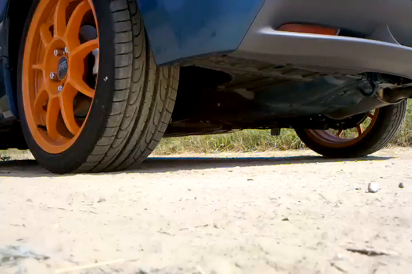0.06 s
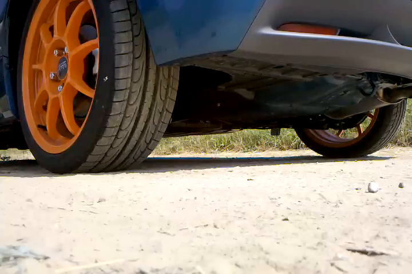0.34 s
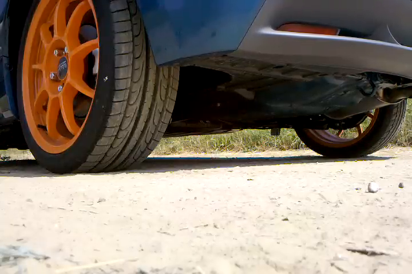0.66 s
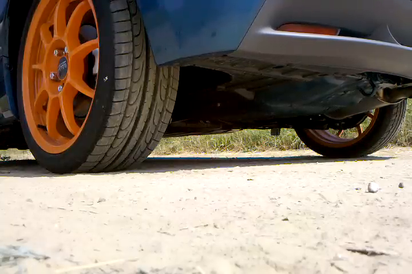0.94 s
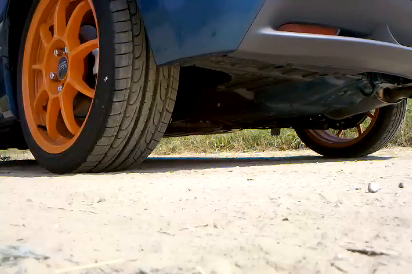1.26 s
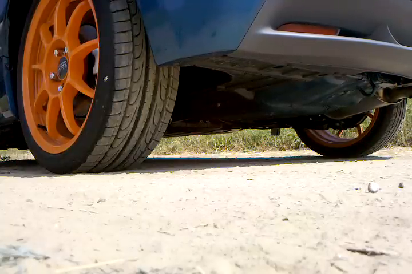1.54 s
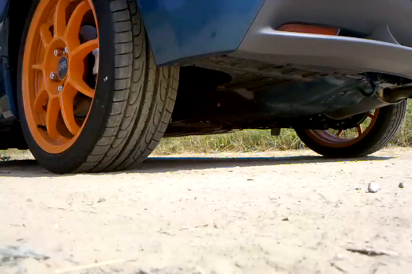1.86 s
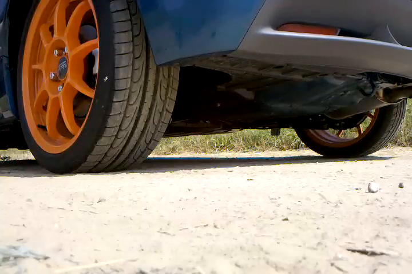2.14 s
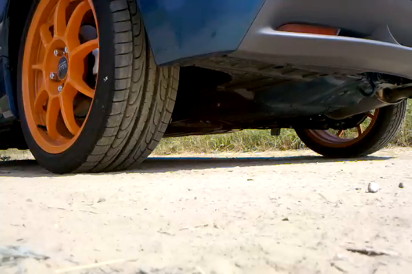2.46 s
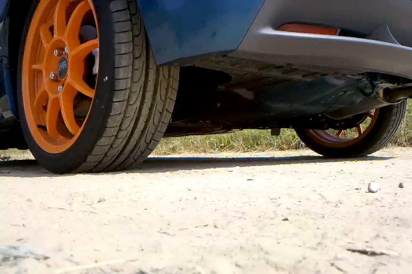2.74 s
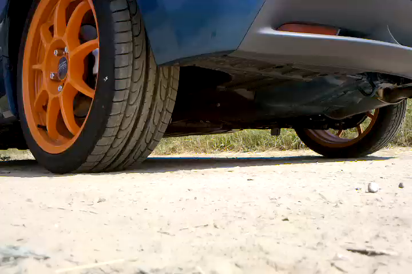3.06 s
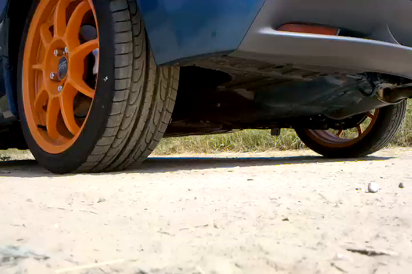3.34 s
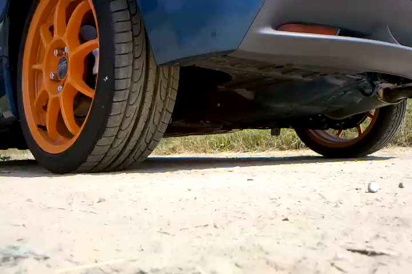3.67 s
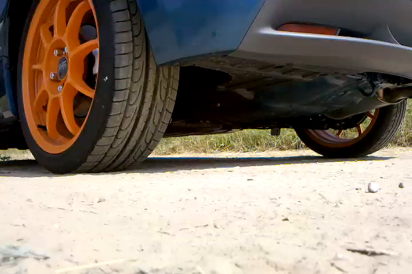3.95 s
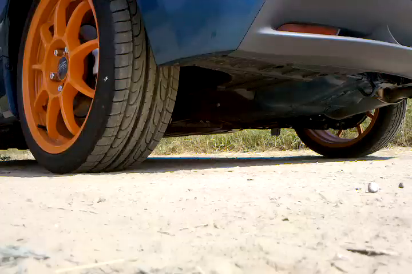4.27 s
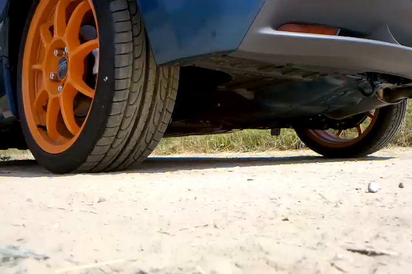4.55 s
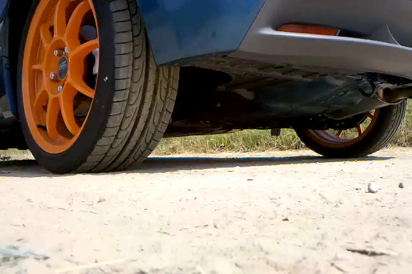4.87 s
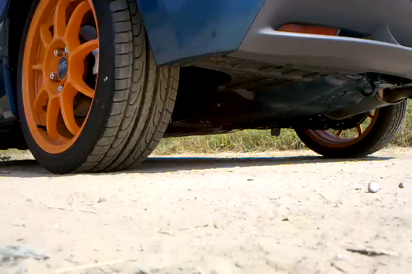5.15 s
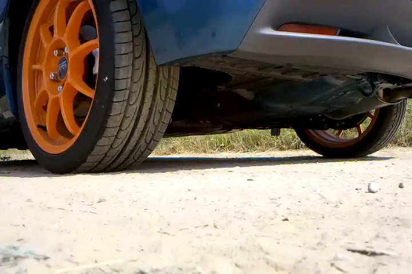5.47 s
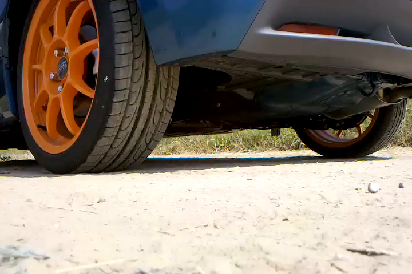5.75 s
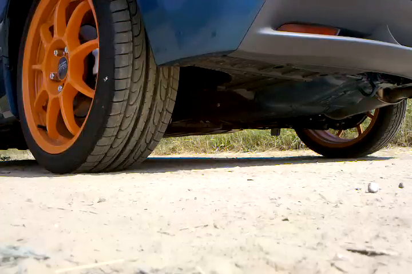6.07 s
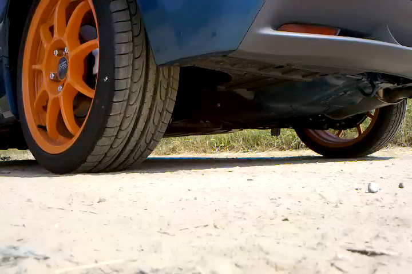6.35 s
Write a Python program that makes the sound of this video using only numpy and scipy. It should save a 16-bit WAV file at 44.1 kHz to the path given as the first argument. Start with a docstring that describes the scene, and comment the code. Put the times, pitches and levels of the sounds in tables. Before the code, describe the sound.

A parked four-cylinder car is revved outdoors, heard near the ground beside the tailpipe. The exhaust has a low, buzzing boom, with ringing overtones, a gassy rasp and hiss. It starts already at high revs, cracks at about 0.2 seconds, sags slightly and climbs again around 0.7. The sound cuts out for an instant at 1 second. The engine then barks against its rev limiter in four even bursts, at about 1.2, 1.6, 2.0 and 2.5 seconds. From 2.8 seconds it coasts down, the pitch falling steadily with a hollow howl as it grows quieter. Another brief silence comes just after 4 seconds. At 4.7 seconds one sharp throttle blip lifts the pitch, peaking near 5 seconds, lower than before. The engine then sinks toward idle with slight stumbles, and the sound stops abruptly at about 6.3 seconds.

```python
"""Outdoors, near the ground beside the tailpipe of a parked four-cylinder car being revved.
It barks off the rev limiter in short burns, coasts down, is blipped once and sinks toward idle.
Exhaust pulses make a low boom; their overtones ring and howl as they glide through the pipe's
resonances. Turbulent gas rasps in the pipe and hisses at its mouth.
The sound drops out abruptly twice, and again at the end."""
import sys
import numpy as np
from scipy import signal
from scipy.fft import rfft, irfft
from scipy.io import wavfile

SR = 44100
rng = np.random.default_rng(int(sys.argv[2]) if len(sys.argv) > 2 else 0)


def digitize_waveform(pressure):
    """Quantize a signal to 16-bit integers and store it at the path in sys.argv[1].

    Rows of a 2-D input are taken as channels; values are limited to [-1, 1].
    """
    field = np.atleast_2d(pressure).T
    bounded = np.clip(field, -1, 1)
    quanta = np.round(bounded * 32767).astype(np.int16)
    wavfile.write(sys.argv[1], SR, quanta)


N = 283122
T = np.arange(N) / SR

# Speed is the firing rate; an order is a multiple of it. Table levels are relative, ahead of the mix.
# Fuel burns at the limiter: start_s, end_s, before_hz, after_hz, crack_db
BURNS = [(.181, .206, 148.8, 156.8, 6), (0.651, .803, 136.2, 163.6, 3), (1.192, 1.280, 150.7, 164.3, 9.5),
         (1.615, 1.703, 151.0, 164.6, 7.5), (2.037, 2.12, 149.3, 165.2, 9.5),
         (2.453, 2.543, 149.3, 164.5, 9)]
# Speed through the run-down and the blip: time_s, firing_hz
RUNDOWN = [(2.8, 148.3), (2.9, 146.2), (3.0, 142.0), (3.2, 131.9), (3.36, 124.7), (3.6, 114.3), (4.0, 97.4),
           (4.4, 83.9)]
BLIP = [(4.71, 71.3), (4.8, 86.2), (4.9, 114.4), (4.97, 127.5), (5.05, 129.3), (5.2, 125.0), (5.6, 107.8),
        (5.8, 96.1), (6.33, 73.7)]
# Throttle presses: opens_s, shuts_s, opening_s, closing_s
PRESSES = [(-.1, 0.23, 0.024, 0.034), (.672, 2.735, .05, 0.092), (4.719, 4.975, .015, .06)]
# Throttle open, fuel cut, cylinders pumping air: firing_hz, tone_db, octave_db, rasp_db
PUMPING = [(150.6, -29.5, -25.5, -35), (154.2, -43.5, -24, -33), (158.1, -30.5, -24, -33.5),
           (162.8, -27, -30, -31)]
# Full power: firing_hz, tone_db, octave_db, ring_db, rasp_db, hiss_db
FULL_POWER = [(73.4, -44, -24, -37.5, -43.5, -46), (90.6, -32.5, -20, -31, -36, -40.5),
              (110.8, -26, -31.5, -35.5, -36.5, -38), (125, -30, -40, -31, -39.5, -40.5),
              (143.5, -17, -30.5, -28, -35, -36), (154.4, -16, -27, -21, -30, -32),
              (163.2, -16, -28.5, -25.5, -30.5, -32.5)]
# Throttle shut: firing_hz, tone_db, octave_db
COASTING = [(72, -52, -34.5), (87.2, -46, -33), (97.4, -45, -39), (105.5, -35.5, -42), (116.3, -27.5, -62),
            (123.8, -25.5, -51), (139, -19.5, -34.5), (148.2, -17.5, -36), (154, -25.5, -46.5)]
# Coasting orders crossing the main resonance: order, centre_hz, half_width_hz, level_db
FLARES = [(4, 614, 4.5, -23.5), (4, 580, 12, -40.5), (5, 583, 13, -34), (5, 612, 18, -38),
          (7, 588, 16, -46.5)]
# Pipe resonances: centre_hz, width_hz, lift_db
MAIN_MODE = (601, 36, 17)
UPPER_MODES = [(1050, 105, 19), (1355, 90, 11), (1530, 100, 9), (1950, 160, 5), (2220, 110, 6),
               (2830, 110, 7), (3150, 140, 7)]
# Spectra of stroke overtones, rasp (throttle open, shut) and hiss: frequency_hz, level_db
OVERTONES = [(220, 5), (295, 17), (360, 6), (460, 6), (540, -12), (750, -11), (900, -15), (1050, -21),
             (1200, -12), (1350, -10), (1700, -9), (2450, -6), (2750, -14), (4800, -21)]
OPEN_RASP = [(70, -32), (130, 7.5), (250, 4.5), (500, 5), (700, 6), (880, 1), (1120, 6), (1380, -6),
             (1780, 4), (2400, -1), (2650, -14), (3500, -19)]
SHUT_RASP = [(70, -27.5), (130, 7.5), (300, 4), (480, 8), (800, 0), (1200, -1.5), (1600, -2.5), (2000, 3),
             (2400, -2), (2650, -7.5), (3500, -14.5)]
HISS = [(1530, -34.5), (2600, -5.5), (2690, -10.5), (2930, -3.5), (3400, -2.5), (3680, -5), (3980, -1),
        (4220, -6.5), (4570, -0.5), (4810, -1), (5160, -6), (5940, -11.5), (6870, -21.5), (7210, -31),
        (7440, -34.5), (9670, -69.5), (16400, -120)]
# Howling tailpipe resonances: centre_hz, width_hz, level_db
HOWLS = [(1055, 76, -26.5), (1352, 60, -37), (1555, 90, -45)]
# Stumbles as fuelling changes: time_s, half_length_s, unevenness, boom_dip_db
STUMBLES = [(.192, .016, 0.06, 5), (.648, 0.016, .4, 6), (2.883, 0.039, .35, 18), (5.08, 0.079, .35, 13.5),
            (5.68, 0.058, 0.5, 1)]
# Silences: start_s, end_s
DROPOUTS = [(.969, 1.092), (4.0366, 4.164), (6.3405, 6.5)]

START_FIRING_HZ, REFERENCE_FIRING_HZ = 157.3, 147


def from_db(db):
    """Decibels to gain."""
    return 10 ** (np.asarray(db) / 20)


def lookup(rows, x):
    """Table columns interpolated at x along the first."""
    axis, *columns = np.transpose(rows)
    return [np.interp(x, axis, column) for column in columns]


def gate(start_s, end_s, rise_s, fall_s):
    """Unit gate with sloping edges."""
    return np.clip(np.minimum((T - start_s) / rise_s, (end_s - T) / fall_s) + .5, 0, 1)


def bump(time_s, half_length_s):
    """Gaussian pulse, peak 1."""
    return np.exp(-((T - time_s) / half_length_s) ** 2)


def drift(rate_hz):
    """Slow random curve, spread about 1."""
    points = rng.standard_normal(N // 20)
    return 1.2 * np.interp(T * rate_hz, np.arange(len(points)), points)


def spectrum_gain(points, hz):
    """Gain of a tabled spectrum at hz."""
    points_hz, db = np.transpose(points)
    return from_db(np.interp(np.log(hz + 1), np.log(points_hz), db, left=-70, right=-70))


def resonances(modes, hz):
    """Gain of a flat path with resonant peaks."""
    return 1 + sum((from_db(lift_db) - 1) / (1 + (2 * (hz - centre_hz) / width_hz) ** 2)
                   for centre_hz, width_hz, lift_db in modes)


def coloured(noise, gain_at, band_hz):
    """Shaped noise, rms 1 inside the band."""
    hz = np.arange(N // 2 + 1) * SR / N
    spectrum = rfft(noise) * gain_at(hz)
    inside = irfft(spectrum * ((hz > band_hz[0]) & (hz < band_hz[1])), N)
    return irfft(spectrum, N) / inside.std()


def overtone(strokes, order, waver, waver_hz):
    """One order, wavering in strength and phase, delayed by pipe dispersion."""
    wobble = waver * (drift(waver_hz) + 1j * drift(waver_hz))
    delay_cycles = .13 * order ** 2
    return np.real((1 + wobble) * np.exp(2j * np.pi * (order * strokes - delay_cycles)))


def high_revs(firing_hz):
    """Ramp from 0 at 125 Hz to 1 at 150 Hz."""
    return np.clip((firing_hz - 125) / 25, 0, 1)


def engine_speed():
    """Firing rate: climbs in each burn and sinks between; then run-down and blip."""
    points = [(0, START_FIRING_HZ)]
    for start_s, end_s, before_hz, after_hz, _ in BURNS:
        points += [(start_s, before_hz), (end_s, after_hz)]
    return lookup(points + RUNDOWN + BLIP, T)[0]


def open_throttle_db(firing_hz, pump_ring_db=-34, pump_hiss_db=-35.5, edge_s=.012):
    """Tone, octave, ring, rasp, hiss: cylinders fire when fuelled, else pump air."""
    tone_db, octave_db, rasp_db = lookup(PUMPING, firing_hz)
    pumping_db = np.array(np.broadcast_arrays(tone_db, octave_db, pump_ring_db, rasp_db, pump_hiss_db))
    fuel = sum(gate(start_s, end_s, edge_s, edge_s) for start_s, end_s, *_ in BURNS) + (T > BLIP[0][0])
    return fuel * np.array(lookup(FULL_POWER, firing_hz)) + (1 - fuel) * pumping_db


def coasting_db(firing_hz, ring_floor_db=-48):
    """Tone, octave, ring, rasp, hiss with the throttle shut: set by speed alone."""
    flares = sum(from_db(db) / (1 + ((order * firing_hz - centre_hz) / half_width_hz) ** 4)
                 for order, centre_hz, half_width_hz, db in FLARES)
    ring_db = 20 * np.log10(np.hypot(from_db(ring_floor_db), flares))
    excess_hz = firing_hz - REFERENCE_FIRING_HZ
    rasp_db = -39 + .19 * excess_hz
    hiss_db = -49.5 + .17 * excess_hz
    return np.array([*lookup(COASTING, firing_hz), ring_db, rasp_db, hiss_db])


def layer_gains(firing_hz, throttle):
    """Tone, octave, ring, rasp, hiss blended by throttle; stumbles dip the first two."""
    levels_db = throttle * open_throttle_db(firing_hz) + (1 - throttle) * coasting_db(firing_hz)
    levels_db[:2] -= sum(dip_db * bump(time_s, half_s) for time_s, half_s, _, dip_db in STUMBLES)
    return from_db(levels_db)


def boom(strokes, tone, octave, throttle):
    """Exhaust pulses' two lowest orders; unequal cylinders add a weak lope."""
    phase = 2 * np.pi * strokes
    lope = 1 + .0049 * np.cos(phase / 2) + .013 * np.cos(phase / 4)
    flutter = 1 + (.008 + .08 * throttle) * drift(70)
    return lope * flutter * (tone * np.cos(phase) + octave * np.sin(2 * phase))


def pipe_ring(strokes, firing_hz, throttle, hollow, even_db=-11, rolloff_hz=720):
    """Orders 4-9 ring in turn as they cross the pipe's main resonance."""
    centre_hz, width_hz, lift_db = MAIN_MODE
    heat = high_revs(firing_hz)
    hot_mode = (centre_hz * (1 + .027 * heat), width_hz, lift_db)   # hotter gas raises the note
    out, power = 0, 0
    for order in range(4, 10):
        hz = order * firing_hz
        gain = resonances([hot_mode], hz) / (1 + (hz / rolloff_hz) ** 12)
        gain *= from_db(even_db * hollow * (1 - heat) * (order % 2 == 0))
        out += gain * overtone(strokes, order, waver=.08 + .3 * throttle, waver_hz=59.95)
        power += gain ** 2 / 2
    return out / np.sqrt(power)


def buzz(strokes, firing_hz, throttle, hollow, even_db=-7, half_order_db=-14, load_db=-8, fading_db=3):
    """Overtones sweep the upper resonances; load weakens and roughens them."""
    grid_hz = np.arange(200, 6000, 4.)
    path = spectrum_gain(OVERTONES, grid_hz) * resonances(UPPER_MODES, grid_hz)
    out = 0
    for order in [*np.arange(3, 31), *np.arange(5.5, 16)]:
        level_db = half_order_db if order % 1 else even_db * hollow * (order in (4, 6, 8, 10, 12))
        level_db += load_db * throttle * (order > 4)
        level_db -= 3 * high_revs(firing_hz) * (order == 7)
        level_db += fading_db * (order > 10) * drift(7)
        gain = from_db(level_db) * np.interp(order * firing_hz, grid_hz, path)
        waver = (.012 + .008 * throttle) * order
        out += gain * overtone(strokes, order, waver, waver_hz=45.1)
    return out * np.sqrt(firing_hz / 120)


def puffs(strokes, depth_db, uneven_db):
    """Turbulence pulsing with each exhaust stroke, no two equally strong."""
    strength = rng.standard_normal(2000)[(strokes + .5).astype(int)]
    level_db = depth_db * np.cos(2 * np.pi * strokes) + uneven_db * strength
    return rng.standard_normal(N) * from_db(level_db)


def gas_rasp(strokes, throttle, band_hz=(1400, 2600)):
    """Turbulence in the pipe, more resonant with the throttle shut."""
    def shut_gain(hz):
        return spectrum_gain(SHUT_RASP, hz) * resonances(UPPER_MODES, hz) ** .43

    open_puffs = puffs(strokes, depth_db=2.5, uneven_db=-.9)
    shut_puffs = puffs(strokes, depth_db=-.5, uneven_db=1)
    open_rasp = coloured(open_puffs, lambda hz: spectrum_gain(OPEN_RASP, hz), band_hz)
    shut_rasp = coloured(shut_puffs, shut_gain, band_hz)
    return from_db(-.5) * np.sqrt(throttle) * open_rasp + np.sqrt(1 - throttle) * shut_rasp


def jet_hiss(strokes):
    """Pulsed jet noise at the pipe's mouth."""
    turbulence = puffs(strokes, depth_db=1, uneven_db=.66)
    return coloured(turbulence, lambda hz: spectrum_gain(HISS, hz), band_hz=(3200, 7000))


def howl(strokes, firing_hz, throttle, hollow, even_db=-5.5, loaded_db=-10, slope_db_per_hz=.29):
    """Orders 7-15 sing in the upper resonances: rough under load, clear once coasting settles."""
    unsettled = sum(gate(opens_s, shuts_s + 3.6 * closing_s, opening_s, fall_s=.06)
                    for opens_s, shuts_s, opening_s, closing_s in PRESSES)
    settled = 1 - np.clip(unsettled, 0, 1)
    coast_gain = settled * from_db(slope_db_per_hz * (firing_hz - REFERENCE_FIRING_HZ))
    hot_gas_ratio = 1 + .035 * throttle
    waver = .1 + .16 * (1 - hollow) + .2 * throttle
    out = 0
    for order in range(7, 16):
        gain = sum(from_db(db) / (1 + (2 * (order * firing_hz - hz * hot_gas_ratio) / width_hz) ** 4)
                   for hz, width_hz, db in HOWLS)
        gain *= from_db(even_db * hollow * (order % 2 == 0))
        out += gain * overtone(strokes, order, waver, waver_hz=49.9)
    return (coast_gain + throttle * from_db(loaded_db)) * out


def surge(delay_s=.0026, rise_s=.003, decay_s=.015, blip_db=12, lull_db=7.5):
    """Gas flow gain: leaps as fuel catches, sags just after it is cut."""
    cracks = [(start_s + delay_s, db) for start_s, *_, db in BURNS] + [(PRESSES[-1][0], blip_db)]
    leap_db = 0
    for time_s, crack_db in cracks:
        attack = np.clip((T - time_s) / rise_s + 1, 0, 1)
        leap_db += crack_db * attack * np.exp(-np.maximum(T - time_s, 0) / decay_s)
    sag_db = sum(lull_db * bump(end_s + .014, half_length_s=.012) for _, end_s, *_ in BURNS)
    return from_db(leap_db - sag_db)


def stumble(strokes):
    """Stroke gain: randomly weak or strong while the engine stumbles."""
    unevenness = sum(depth * bump(time_s, half_s) for time_s, half_s, depth, _ in STUMBLES)
    strength = rng.standard_normal(int(strokes[-1]) + 2)
    return 1 + unevenness * np.interp(strokes, np.arange(len(strength)), strength)


def scene():
    """One crankshaft drives every layer; speed, throttle and fuel set the levels."""
    firing_hz = engine_speed()
    strokes = np.cumsum(firing_hz * (1 + .001 * drift(40))) / SR
    throttle = np.clip(sum(gate(*press) for press in PRESSES), 0, 1)
    tone, octave, ring_gain, rasp_gain, hiss_gain = layer_gains(firing_hz, throttle)
    hollow = (1 - throttle) * tone ** 2 / (tone ** 2 + octave ** 2)   # coasting on a strong fundamental
    rasp = from_db(-1.5 * hollow) * gas_rasp(strokes, throttle)
    hiss = hiss_gain * jet_hiss(strokes)
    lows = from_db(3.5) * boom(strokes, tone, octave, throttle)
    ring = from_db(-1 - throttle) * ring_gain * pipe_ring(strokes, firing_hz, throttle, hollow)
    howling = howl(strokes, firing_hz, throttle, hollow)
    overtones = from_db(-11.5 + 5.5 * hollow) * buzz(strokes, firing_hz, throttle, hollow)
    flow = surge()
    body = flow * rasp_gain * (rasp + overtones)
    jet = flow ** 1.28 * hiss   # jet noise grows faster than the flow
    return (stumble(strokes) * (lows + ring + howling) + body + jet)[None]


def record(dry, low_cut_hz=66, high_cut_hz=7300):
    """Deep bass cut, brief dropouts, top cut."""
    thin = signal.sosfilt(signal.butter(8, low_cut_hz, "high", fs=SR, output="sos"), dry)
    live = 1 - sum((T > start_s) & (T < end_s) for start_s, end_s in DROPOUTS)
    return signal.sosfilt(signal.butter(24, high_cut_hz, fs=SR, output="sos"), thin * live)


dry = scene()
out = record(dry)
digitize_waveform(out)
```